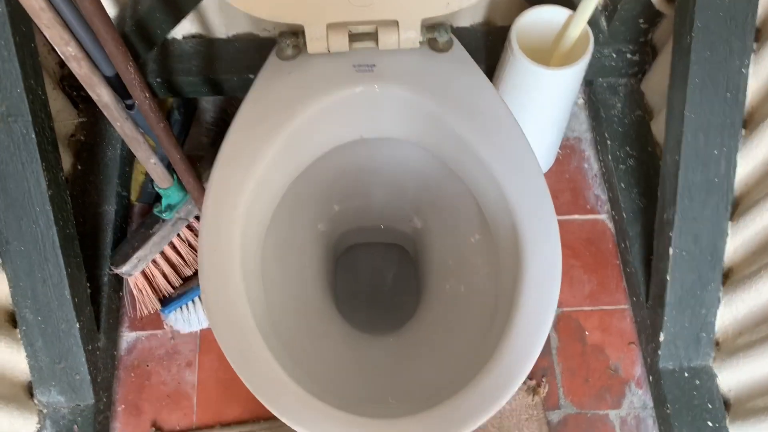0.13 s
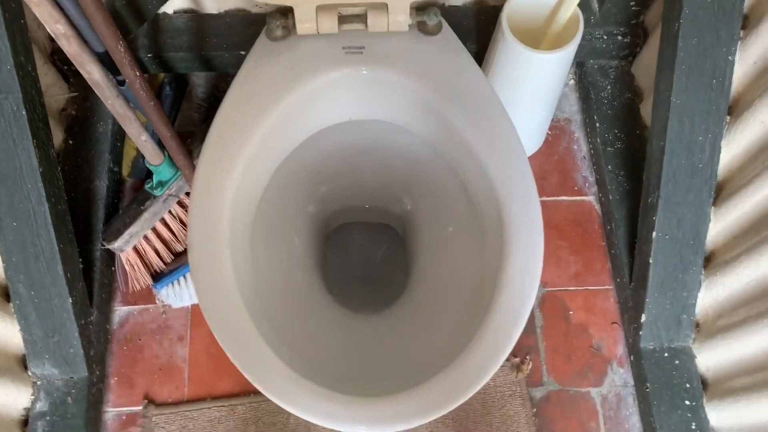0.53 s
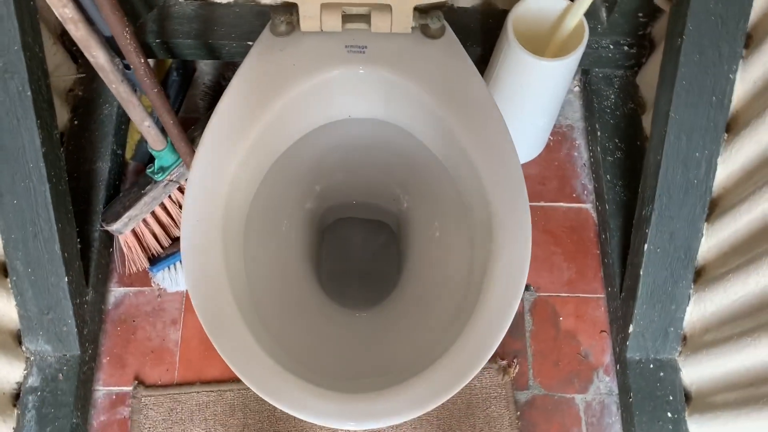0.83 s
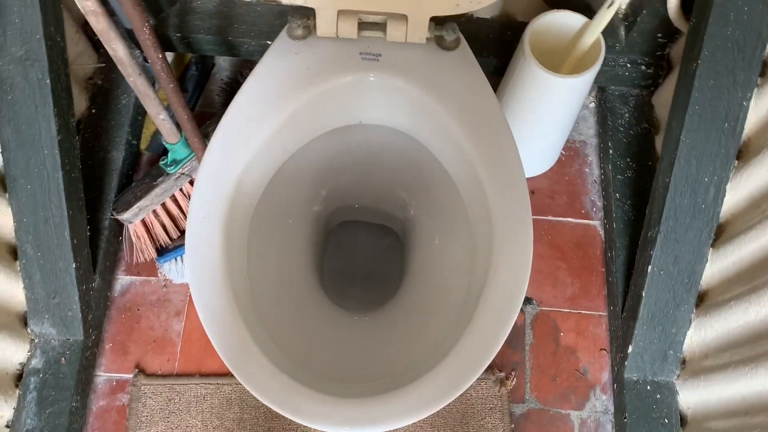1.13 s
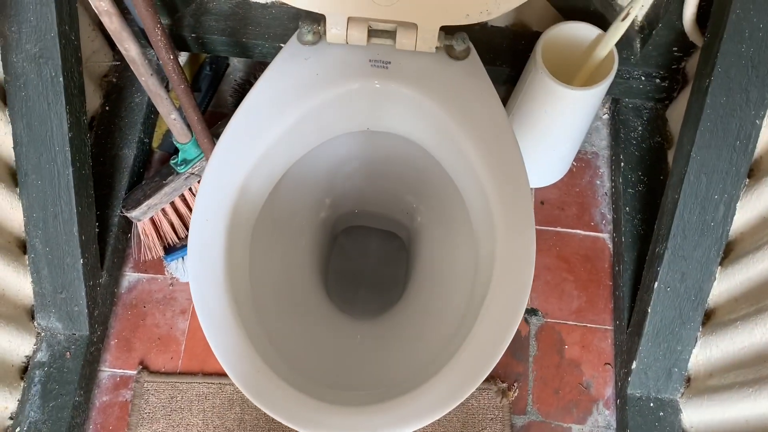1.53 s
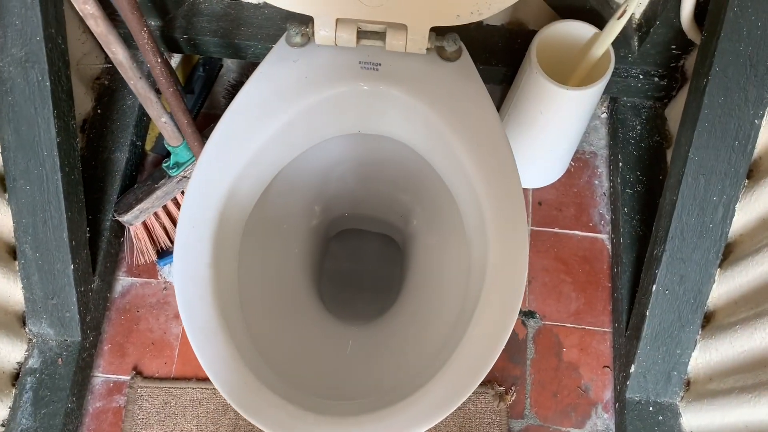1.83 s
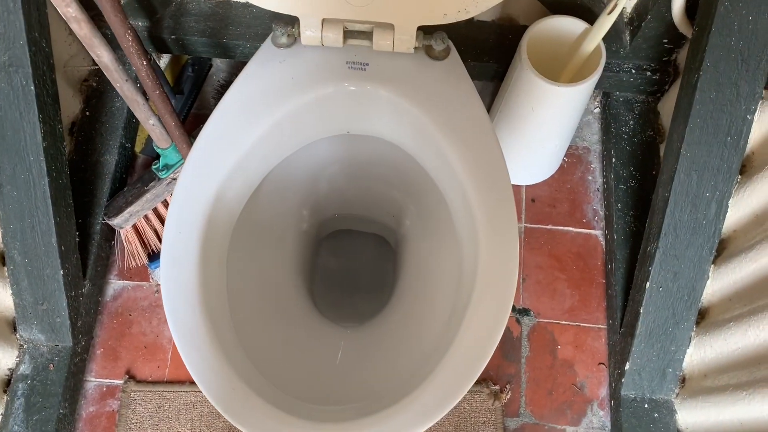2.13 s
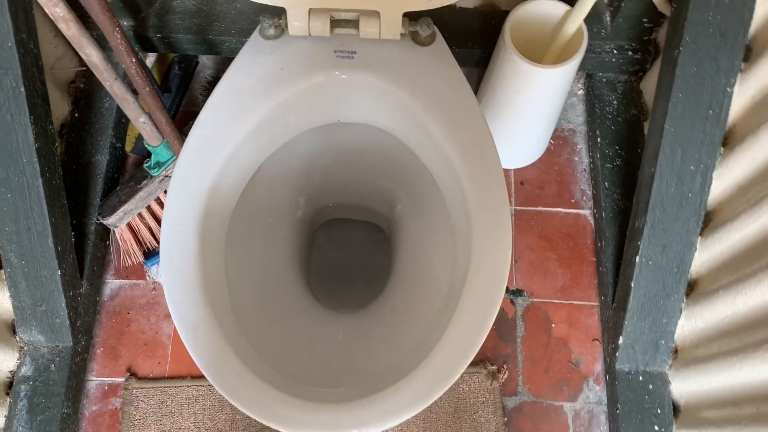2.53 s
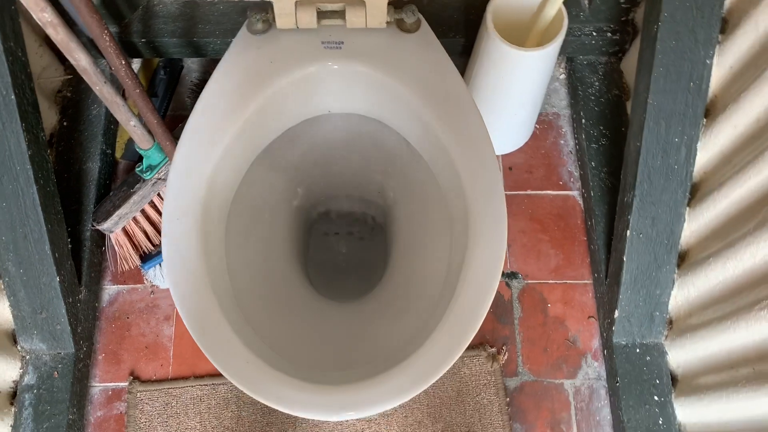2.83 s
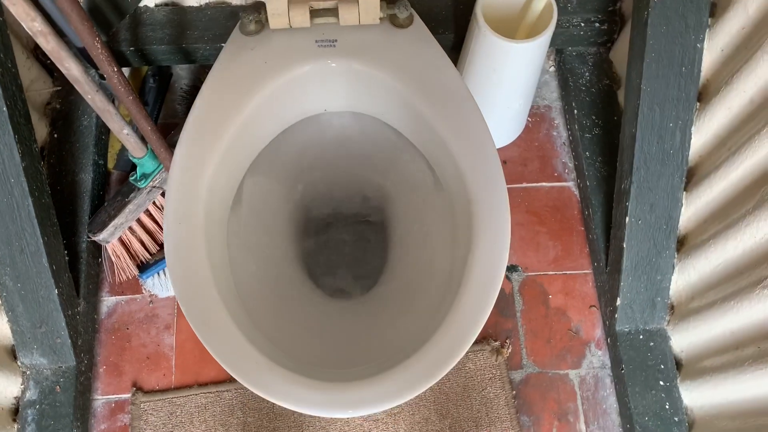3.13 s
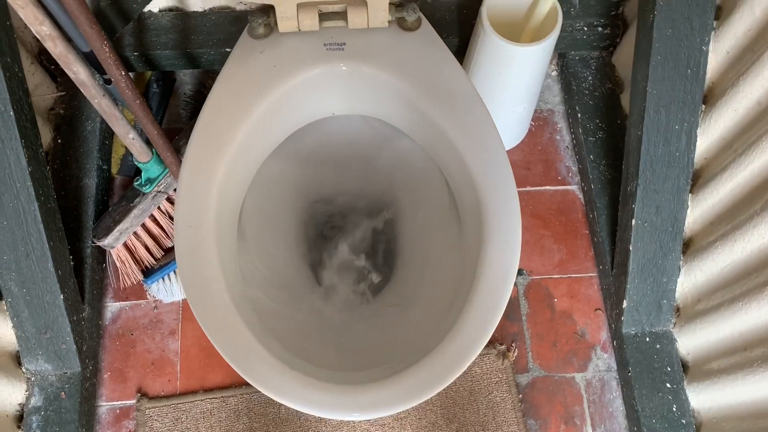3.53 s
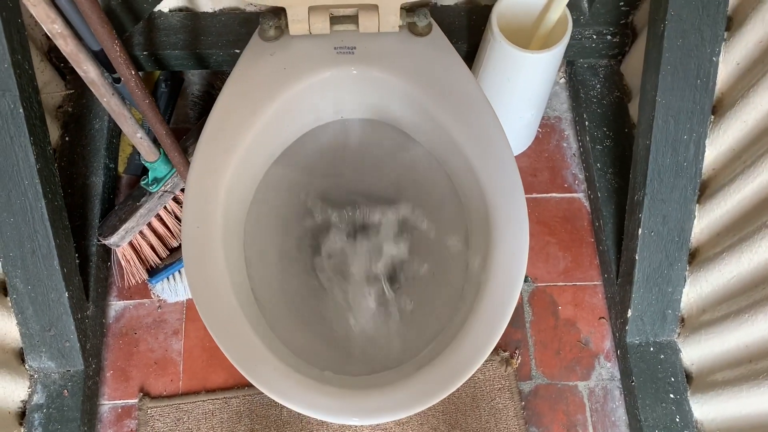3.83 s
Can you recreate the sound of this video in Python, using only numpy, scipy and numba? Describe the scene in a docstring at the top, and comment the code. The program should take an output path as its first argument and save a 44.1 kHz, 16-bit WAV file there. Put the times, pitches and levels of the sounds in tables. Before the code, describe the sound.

Toilet flush heard close above the bowl in a small shed: quiet with faint handling rustle and taps, small lever clicks, then deep hollow glugs, valve hiss and building splash and spray, still running at the end.

```python
"""Toilet flush in a small shed

A phone is held above the bowl: a hand rustles, taps and squeaks on it, then lever and valve knock.
Air glugs as steady-pitched sines over noise-driven hollows of pipe and bowl; swarms of small bubbles
splash in the bowl; noisy spray from the rim reaches the left first. A short reverb follows the tank.
Valve hiss, rumble and a noise floor lie underneath."""
import sys
import numpy as np
from scipy import signal
from scipy.fft import rfft, irfft
from scipy.io import wavfile
from scipy.ndimage import uniform_filter1d
from numba import njit

SR = 44100
rng = np.random.default_rng(int(sys.argv[2]) if len(sys.argv) > 2 else 0)


def dump_mix(stems):
    """Bounce the given channels to the path in sys.argv[1] as a 16-bit WAV at rate SR."""
    frames = np.atleast_2d(stems).T  # one column per channel
    limited = np.clip(frames, -1, 1)  # hard clip at full scale
    pcm = np.round(limited * 32767).astype(np.int16)
    wavfile.write(sys.argv[1], SR, pcm)


def level_to_linear(level):
    """Convert decibel levels to linear amplitude factors, elementwise."""
    exponent = np.asarray(level, float) / 20
    return 10 ** exponent


N = 176400
T = np.arange(N) / SR

# levels in all tables are relative
# hollow resonances of pipe and bowl: pitch_hz, width_hz, level_db
DEEP_HOLLOWS = [(87, 13.7, -12), (160.2, 50, -1)]
LOW_HOLLOWS = [(243.4, 23, -1), (283, 15.2, 1.5), (318.2, 11, -5)]
UPPER_HOLLOWS = [(409, 34, -3), (485.4, 17.5, 3.5), (543.3, 25, -2.5), (630.5, 24, -2.5), (739, 46, -3.5),
                 (745, 170, -9.5)]
# gurgle in the hollows: time_s, deep_db, low_db, upper_db
GURGLE_LEVELS = [(1.29, -71, -70, -86), (1.51, -66.5, -70, -77), (1.55, -43, -46.5, -50),
                 (1.62, -55.5, -64, -77), (1.705, -45.5, -42, -53), (1.83, -47.5, -64, -62),
                 (1.87, -40.5, -51, -41.5), (1.99, -66, -60, -57), (2.04, -32.5, -64, -44),
                 (2.17, -72, -39, -41.5), (2.23, -43, -22, -29), (2.33, -17.5, -23.5, -20),
                 (2.42, -33.5, -14, -22), (2.53, -34, -26.5, -31), (2.7, -32.5, -24.5, -26),
                 (2.92, -26, -22.5, -29), (3.1, -31, -25, -25.5), (3.36, -29, -19, -18),
                 (3.55, -30, -31, -25.5), (3.8, -30.5, -30.5, -26), (4, -23, -35, -27)]
# air bubbles, big and low, plus two high knocks at 2.343 s sounded the same way: start_s, level_db, pitch_hz
GLUGS = [(1.704, -32, 135), (1.856, -24, 433), (1.889, -30, 530), (2.109, -24.5, 620), (2.254, -14, 630),
         (2.297, -18, 154), (2.324, -2, 293), (2.343, -20, 1538), (2.343, -22.5, 1210), (2.366, -9, 695),
         (2.393, -7, 620), (2.397, -23, 283), (2.424, -1, 278), (2.663, -13.5, 495), (2.665, -10, 283),
         (2.802, -5.5, 283), (2.847, -8, 149), (2.888, -11, 588), (2.98, -10, 530), (2.988, -8, 283),
         (3.114, -9.5, 514), (3.224, -13, 260), (3.269, -8.5, 307), (3.291, -6, 474), (3.369, -10, 491),
         (3.371, -4.5, 284), (3.466, -9, 468)]
# water flow: time_s, splash_db, spray_db
WATER_LEVELS = [(1.75, -74, -99), (1.85, -67, -91), (2, -59, -81), (2.03, -46, -66), (2.08, -72, -45.5),
                (2.17, -71, -73), (2.21, -45.5, -49), (2.37, -38.5, -48), (2.52, -40.5, -49),
                (2.7, -38.5, -45), (2.76, -35, -37.5), (2.83, -32.5, -37.5), (2.87, -32.5, -41),
                (2.91, -32.5, -32), (3.01, -30.5, -40.5), (3.03, -27, -33.5), (3.09, -31, -38),
                (3.17, -29.5, -32.5), (3.29, -26.5, -32.5), (3.4, -27, -29.5), (3.6, -27.5, -28.5),
                (3.8, -29.5, -28), (4, -31, -31.5)]
# splash spectrum: freq_hz, gain_db
SPLASH_COLOUR = [(500, 11), (800, -10), (1000, -2.5), (2000, 2.5), (3300, -0.5), (5000, -6), (6500, -5.5),
                 (9000, -33)]
# spray spectrum: freq_hz, gain_db
SPRAY_COLOUR = [(2500, -29), (4000, -14), (6000, -9), (8000, 5.5), (11000, 2.5), (15500, 0.5), (16300, -36)]
# short spurts of spray: start_s, level_db
SPURTS = [(2.9118, -23), (2.9567, -14.5), (3.0205, -12), (3.094, -8), (3.1263, -18), (3.1964, -7.5),
          (3.305, -11.5), (3.496, -7)]
# water hissing through the valve: time_s, level_db
VALVE_LEVELS = [(1.74, -100), (1.84, -71), (2, -67), (2.15, -61), (2.25, -51), (2.5, -41), (2.9, -53.5)]
# bands in the valve's hiss: centre_hz, level_db, width_hz
VALVE_BANDS = [(1516, -3, 30), (2060, -19, 110), (4740, 7.5, 450), (5560, 10, 1500)]
# lever and valve knocks: start_s, level_db, tilt_db_per_octave, t60_s
KNOCKS = [(1.4566, -55, 9, 0.078), (1.5304, -42.5, -6, 0.063), (1.6473, -43, -7.5, 0.11),
          (2.0117, -26.5, 0.5, 0.1), (2.065, -33.5, 10, 0.18)]
# lever resonances: pitch_hz, level_db, width_hz
LEVER_MODES = [(464, -3, 91), (720, -2, 53), (1060, -5, 51), (1533, 4, 58), (2030, 6, 36), (2800, -3, 98),
               (3370, -4.5, 61), (4640, -6, 48), (8300, -22.5, 150)]
# finger taps on the phone: start_s, tick_db, thump_db
TAPS = [(0.102, -54, -58), (0.154, -62, -56), (0.228, -50, -51), (0.444, -52, -55), (0.479, -33.5, -47),
        (0.504, -48, -41), (0.856, -70, -55)]
# phone case resonances: pitch_hz, level_db, width_hz
CASE_MODES = [(480, 1, 110), (1050, -7, 120), (1520, -9, 120), (2720, -21, 300)]
# hand rustle: time_s, level_db
RUSTLE_LEVELS = [(0, -77), (.11, -60), (.19, -61), (.24, -59.5), (.34, -71), (.39, -93), (.47, -61),
                 (.54, -62), (.6, -77), (.85, -72.5), (.95, -83), (1.3, -86), (1.5, -72.5)]
# rustle spectrum: freq_hz, gain_db
RUSTLE_COLOUR = [(120, -5), (200, -3), (450, -7.5), (1050, -7.5), (1500, -13), (2500, -15), (5000, -22),
                 (8500, -30.5), (13000, -30)]
# faint squeaks: start_s, end_s, pitch_hz, level_db
SQUEAKS = [(.64, .705, 1620, -72), (.71, .78, 1690, -72)]
# rumble of hand and moving air on the microphones: time_s, level_db
RUMBLE_LEVELS = [(0, -79), (.12, -59), (.35, -61.5), (.5, -52), (.6, -71), (1.15, -60.5), (1.5, -60.5),
                 (1.85, -55), (1.97, -42.5), (2.15, -53), (2.33, -26), (2.5, -40), (2.9, -41),
                 (3.15, -32.5), (3.7, -44), (4, -52)]
# rumble spectrum: freq_hz, gain_db
RUMBLE_COLOUR = [(12, -18), (28, 0), (50, 4.5), (80, -11), (130, -20.5), (250, -60)]
# quiet of the shed, spectrum: freq_hz, gain_db
FLOOR_COLOUR = [(70, 9), (140, -11), (450, -6.5), (1000, -16.5), (2500, -23.5), (8000, -27.5), (16000, -30)]


def curve(rows, col):
    """Gain over time from a dB column."""
    rows = np.array(rows, float)
    return level_to_linear(np.interp(T, rows[:, 0], rows[:, col]))


def unit(x):
    """Scale to rms 1."""
    return x / np.sqrt(np.mean(x ** 2))


def noise():
    """White noise."""
    return rng.standard_normal(N)


def colour(x, points):
    """Filter by (freq_hz, gain_db) points, joined on a log frequency axis."""
    padded = N + 2 ** 13
    hz = np.fft.rfftfreq(padded, 1 / SR) + 1
    points = np.array(points, float)
    gain_db = np.interp(np.log(hz), np.log(points[:, 0]), points[:, 1], -90, -90)
    return irfft(rfft(x, padded) * level_to_linear(gain_db), padded)[:N]


def ring(x, hz, width_hz):
    """A two-pole resonance."""
    return signal.lfilter(*signal.iirpeak(hz, hz / width_hz, SR), x)


def walk(rate_hz):
    """Random levels held for 1 / rate_hz and smoothed twice."""
    hold = int(SR / rate_hz)
    steps = np.repeat(rng.standard_normal(N // hold + 1), hold)
    return 1.4 * uniform_filter1d(uniform_filter1d(steps, hold), hold)[:N]


def fade(start_s, t60_s, rise_s):
    """Envelope that starts, rises and dies away."""
    age_s = np.maximum(T - start_s, 0)
    return (1 - np.exp(-age_s / rise_s)) * np.exp(-np.log(1000) * age_s / t60_s)


def wide(mid, side, side_db):
    """Left and right from a middle and a side signal."""
    return mid + level_to_linear(side_db) * side * np.array([[1], [-1]])


def drift(x, share):
    """Read at a wandering speed, so that resonances slide."""
    return np.interp(np.cumsum(1 + share * walk(7)), np.arange(N), x)


def hollows(modes, jolt):
    """Turbulence rings each hollow; levels flutter, pitches wander, bubbles jolt them."""
    out = 0
    for hz, width_hz, db in modes:
        tone = unit(ring(ring(noise(), hz, width_hz), hz, 3 * width_hz))
        out = out + level_to_linear(db + 1.69 * walk(18)) * jolt * drift(tone, 0.02)
    return out


def gurgle():
    """Lumpy turbulence drives the hollows; each glug sounds its pitch and jolts them all."""
    out, lumps = 0, walk(25.097)
    jolt = 1 + sum(fade(s, t60_s=0.044, rise_s=0.0034) for s, _, _ in GLUGS)
    started = T > GURGLE_LEVELS[0][0]
    groups = [(DEEP_HOLLOWS, -1), (LOW_HOLLOWS, -2), (UPPER_HOLLOWS, -0.6)]
    for col, (modes, db) in enumerate(groups, start=1):
        lumpy = unit(hollows(modes, jolt) * level_to_linear(1.74 * lumps))
        out = out + level_to_linear(db) * lumpy * curve(GURGLE_LEVELS, col) * started
    for s, db, hz in GLUGS:
        env = fade(s, t60_s=0.099, rise_s=1.58 / hz)
        out = out + level_to_linear(db - 0.5) * env * np.sin(2 * np.pi * hz * (T - s))
    return out


@njit
def bubbles(start, hz, cycles, size, glide, n):
    """Each bubble is a sine that fades over its cycles and glides up."""
    out = np.zeros(n)
    for k in range(len(start)):
        f, phase, a = hz[k], 0., size[k]
        length = int(4 * cycles[k] * SR / f)
        for i in range(int(start[k]), min(n, int(start[k]) + length)):
            out[i] += a * np.sin(phase)
            phase += 2 * np.pi * f / SR
            a *= 1 - f / (cycles[k] * SR)
            f *= 1 + glide / length
    return out


def fizz(count, lo_hz, hi_hz, cycles, spread_db):
    """A swarm of small bubbles and drops, a few far bigger than the rest."""
    when, pitch, length, rarity = rng.random((count, 4)).T
    hz = lo_hz * (hi_hz / lo_hz) ** pitch
    size = level_to_linear(-spread_db * np.log(rarity + 1 / 50))
    return unit(bubbles(when * N, hz, cycles * (.5 + length), size, .1, N))


def bowl(x):
    """Dense short echoes inside the porcelain bowl give fixed narrow resonances."""
    age_s = T[:int(.08 * SR)]
    echoes = rng.standard_normal(len(age_s)) * np.exp(-np.log(1000) * age_s / 0.11)
    echoes[0] = 22  # direct sound
    return unit(signal.fftconvolve(x, echoes)[:N])


def drops():
    """Flickering noise plus a swarm of ringing bubbles."""
    swarm = fizz(count=6000, lo_hz=808.8, hi_hz=7007, cycles=18.6, spread_db=4.5)
    return unit(level_to_linear(4.3 * walk(30)) * noise() + swarm)


def splash(surge):
    """Drops, partly shared by both sides, ring the bowl."""
    shared = drops()
    sides = [unit(colour(bowl(shared + level_to_linear(-0.5) * drops()), SPLASH_COLOUR)) for _ in range(2)]
    flow = curve(WATER_LEVELS, 1) * (T > WATER_LEVELS[0][0])
    return level_to_linear(2.0 * walk(15) + 0.48 * surge + 1.5) * flow * np.array(sides)


def jet():
    """Flickering noise with a swarm of tiny drops."""
    swarm = fizz(count=12000, lo_hz=4050, hi_hz=15380, cycles=32.0, spread_db=5)
    return unit(colour(level_to_linear(2 * walk(40)) * noise() + level_to_linear(-6.0) * swarm, SPRAY_COLOUR))


def lag(x, lag_s):
    """Delay by a phase slope over frequency."""
    padded = N + 2 ** 10
    turn = np.exp(-2j * np.pi * np.fft.rfftfreq(padded, 1 / SR) * lag_s)
    return irfft(rfft(x, padded) * turn, padded)[:N]


def spray(surge):
    """Rim jet and noise spurts reach the left microphone first; separate jets sound on each side."""
    gain = level_to_linear(0.94 * surge + 1) * curve(WATER_LEVELS, 2) * (T > WATER_LEVELS[0][0])
    spurts = sum(level_to_linear(db - 10.5) * fade(s, t60_s=0.053, rise_s=0.0008) for s, db in SPURTS)
    near = jet() * gain + unit(colour(noise(), SPRAY_COLOUR)) * spurts
    around_colour = [(2000, 31), (5500, 8.5), (7500, -10), (17000, -36.5)]
    around = level_to_linear(-1) * gain * np.array([colour(jet(), around_colour) for _ in range(2)])
    return np.array([near, lag(near, lag_s=1 / 3770)]) + around


def valve_hiss():
    """Water through the valve: noise in fluttering bands, separate on each side."""
    sides = []
    for _ in range(2):
        hiss = 0
        for hz, db, width_hz in VALVE_BANDS:
            band = unit(ring(ring(noise(), hz, width_hz), hz, 2 * width_hz))
            hiss = hiss + level_to_linear(db + 1.5 * walk(12)) * band
        sides.append(unit(hiss))
    return curve(VALVE_LEVELS, 1) * np.array(sides)


def lever():
    """Each knock is a short scrape that rings the lever's modes, plus a noisy tail."""
    tail_colour = [(150, 9), (500, -2.5), (2500, -0.5), (5000, -40), (16000, -50.0)]
    out, tail = 0, unit(colour(noise(), tail_colour))
    for s, db, tilt_db, t60_s in KNOCKS:
        env = level_to_linear(db) * fade(s, t60_s, rise_s=0.0066)
        push = noise() * env
        modes = sum(level_to_linear(mode_db + tilt_db * np.log2(hz / 2000)) * ring(push, hz, width_hz)
                    for hz, mode_db, width_hz in LEVER_MODES)
        out = out + level_to_linear(-3.5) * tail * env + level_to_linear(8) * modes
    return out


def case(x):
    """The phone's case rings along with what touches it."""
    return x + level_to_linear(5) * sum(level_to_linear(db) * ring(x, hz, width_hz) for hz, db, width_hz in CASE_MODES)


def rustle():
    """Grainy noise of the hand through the case."""
    mid, side = [unit(case(colour(noise() * level_to_linear(2.0 * walk(69.4)), RUSTLE_COLOUR)))
                 * curve(RUSTLE_LEVELS, 1) * (T < 1.5) for _ in range(2)]
    return wide(mid, side, -3.1)


def taps():
    """Each finger tap is a noise tick that rings the case and a 55 Hz thump."""
    tick_colour = [(200, -10), (600, 4.5), (3000, -4), (9000, -12), (16000, -47)]
    out, tick = 0, unit(colour(noise(), tick_colour))
    for s, tick_db, thump_db in TAPS:
        thump = fade(s, t60_s=0.025, rise_s=0.00074) * np.sin(2 * np.pi * 55 * (T - s))
        out = out + level_to_linear(tick_db - 3.5) * case(tick * fade(s, t60_s=0.011, rise_s=0.00028))
        out = out + level_to_linear(thump_db + 12.0) * thump
    return out


def squeaks():
    """Narrow-band noise swells and dies in a half-sine."""
    out = 0
    for start_s, end_s, hz, db in SQUEAKS:
        swell = np.sin(np.pi * np.clip((T - start_s) / (end_s - start_s), 0, 1))
        out = out + level_to_linear(db) * unit(ring(ring(noise(), hz, 220), hz, 400)) * swell
    return out


def rumble():
    """Lurching low noise of the hand and moving air, nearly alike on both sides."""
    lurch = level_to_linear(2.4 * walk(12)) * curve(RUMBLE_LEVELS, 1)
    mid, side = [unit(colour(noise(), RUMBLE_COLOUR)) * lurch for _ in range(2)]
    return wide(mid, side, -22)


def shed(x):
    """Short reverb of the shed, different at each microphone, with little bass."""
    t60_s, level_db = 0.31, -4
    age_s = T[:int(.4 * SR)]
    decay = np.exp(-np.log(1000) * age_s / t60_s) * (age_s > .002)
    tails = rng.standard_normal((2, len(age_s))) * decay
    wet = signal.fftconvolve(x[None], tails / np.sqrt(np.sum(tails[0] ** 2)), axes=1)[:, :N]
    tone = [(40, -12), (400, -11.5), (900, 5.0), (16000, 3)]
    return level_to_linear(level_db) * np.array([colour(w, tone) for w in wet])


def quiet():
    """Steady noise floor of the shed."""
    mid, side = [unit(colour(noise(), FLOOR_COLOUR)) * level_to_linear(-73) for _ in range(2)]
    return wide(mid, side, -1.3)


def scene():
    """All sources over the quiet of the shed; splash and spray surge together."""
    tank = gurgle() + lever()
    surge = walk(12)
    water = splash(surge) + spray(surge) + valve_hiss()
    hand = rustle() + taps() + squeaks() + rumble()
    direct = tank * level_to_linear(np.array([[-.4], [.4]]))  # slightly to the right
    return direct + shed(tank) + water + hand + quiet()


def top_cut(x):
    """Nothing passes above the cut-off."""
    return signal.sosfilt(signal.butter(12, 17090, fs=SR, output="sos"), x)


def record(dry):
    """The finished mix as the phone keeps it."""
    return top_cut(dry)


dry = scene()
out = record(dry)
dump_mix(out)
```